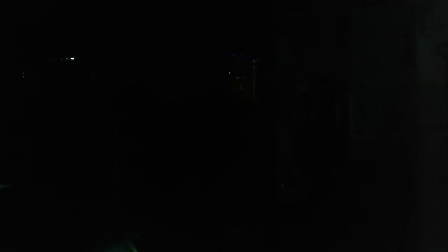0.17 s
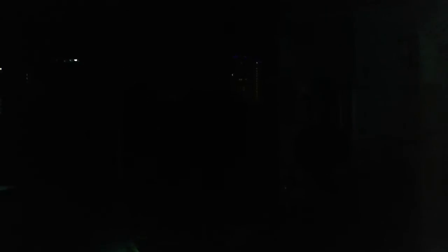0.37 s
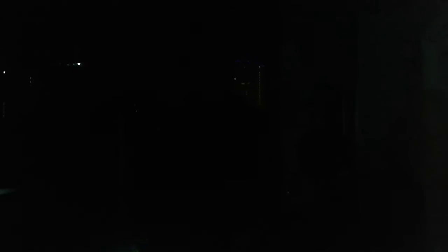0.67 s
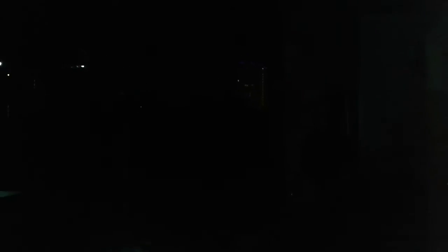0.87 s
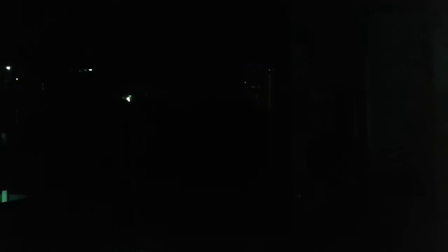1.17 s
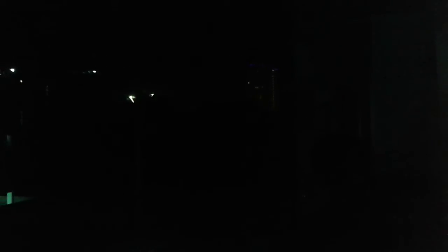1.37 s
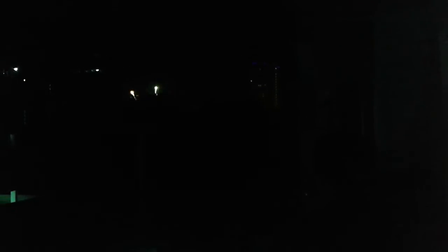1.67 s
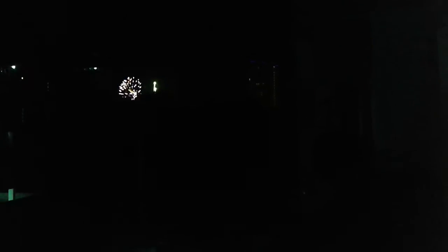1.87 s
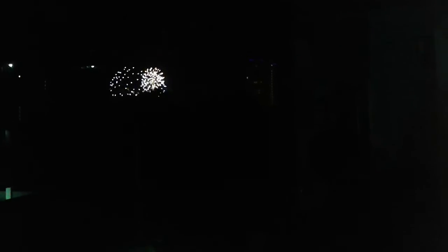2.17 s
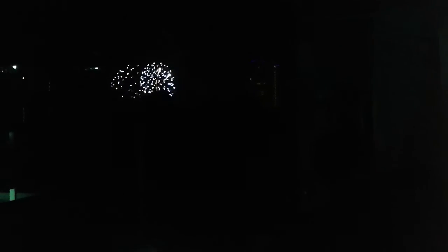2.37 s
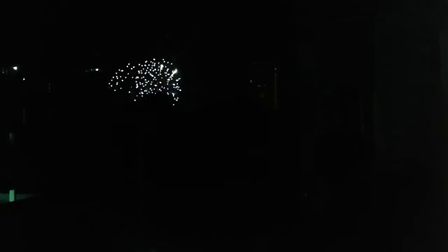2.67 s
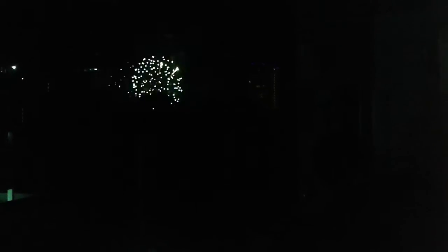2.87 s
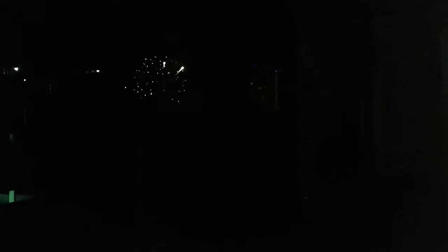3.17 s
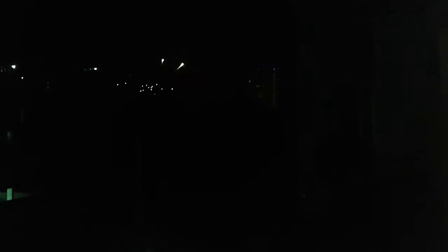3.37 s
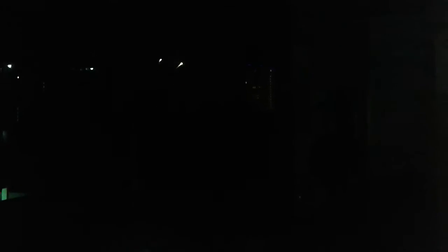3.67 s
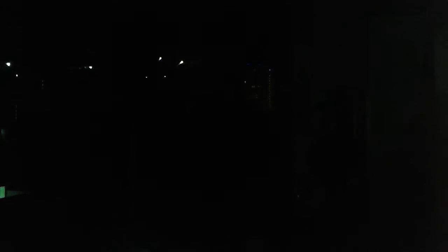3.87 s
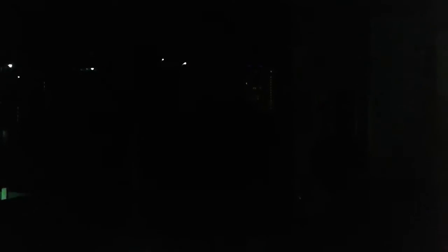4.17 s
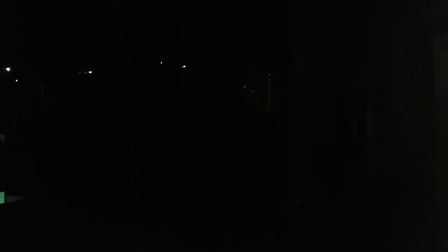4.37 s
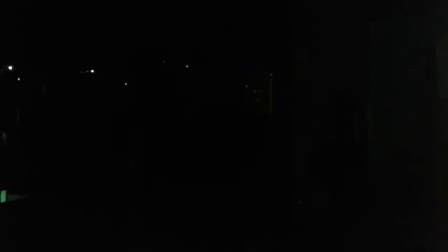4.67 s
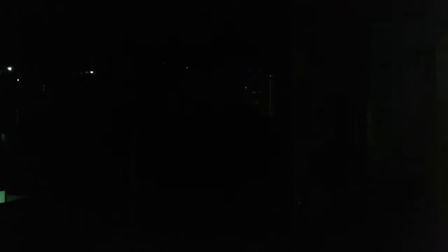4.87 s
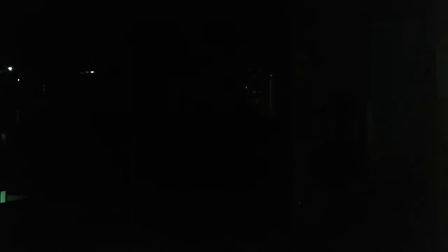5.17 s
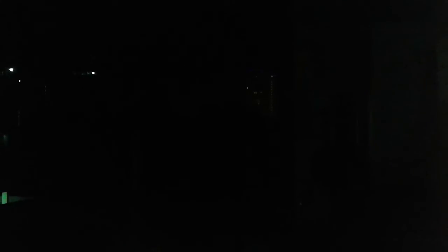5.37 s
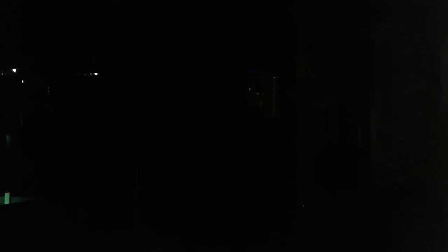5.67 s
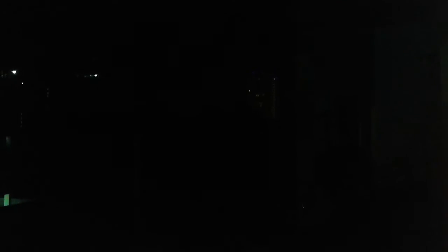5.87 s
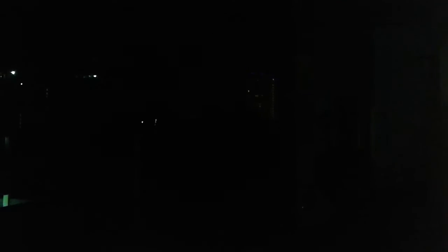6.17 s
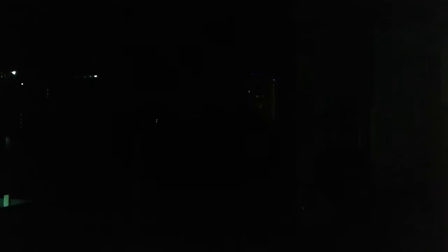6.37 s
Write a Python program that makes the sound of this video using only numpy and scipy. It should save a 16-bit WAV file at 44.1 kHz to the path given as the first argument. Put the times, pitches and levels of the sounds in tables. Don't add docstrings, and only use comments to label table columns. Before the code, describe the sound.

Distant firework salvos bang sharply at night, booming in a small balcony recess and rolling across town, with crickets and a late star crackle.

```python
import sys
import numpy as np
from scipy import signal
from scipy.fft import rfft, irfft, next_fast_len
from scipy.io import wavfile
from scipy.ndimage import map_coordinates

SR = 44100
rng = np.random.default_rng(int(sys.argv[2]) if len(sys.argv) > 2 else 0)


def dump_mix(stems):
    frames = np.atleast_2d(stems).T
    limited = np.clip(frames, -1, 1)
    pcm = np.round(limited * 32767).astype(np.int16)
    wavfile.write(sys.argv[1], SR, pcm)


def ratio(d):
    e = np.asarray(d, float) / 20
    return 10 ** e


N = 287796

# (delay [ms], level [dB], push stretch [ratio], treble corner [Hz])
BALCONY_SURFACES = [(0, 0, 1, 14000), (1.69, 0, .5, 20000), (3.1, -9, .8, 5000), (4.15, 1, 2.6, 1300),
                    (5.05, -10, .4, 9000), (6.5, -10, 1, 1500), (9.2, -11, 1.3, 900),
                    (10.5, 1.5, .2, 20000), (11.3, -9, .2, 9000)]
# (frequency [Hz], level [dB], t60 [s])
RECESS_MODES = [(142.2, -10.5, 0.19), (192.6, -1, 0.039), (265.6, -20, 0.31)]
BOOM_DELAY_MS = 13.0
BLAST_LOW_HZ = 106
# (frequency [Hz], t60 [s])
COURTYARD_T60 = [(100, 0.48), (400, 0.47), (1500, 0.15), (6000, 0.22), (12000, 0.25)]
# (frequency [Hz], density [dB per Hz])
ROLL_COLOUR = [(15, -60), (25, 9), (65, -10.5), (124, -6), (195, -3), (320, -15.5), (429, -10.5),
               (550, -20), (645, -16), (990, -22), (1950, -28), (2790, -34), (5500, -37.5), (7150, -39.5),
               (12100, -120)]
# (centre [Hz], width [Hz], lift [dB])
ROLL_MODES = [(130.3, 37, 7), (206, 11, 2), (253.6, 103, 6), (472, 130, 2.5), (647, 13, 5)]
# (time [s], near streets [dB], far town [dB])
ROLL_SOURCES = [
    (0, -55, -46),
    (.95, -12, -17.5),
    (1.6, -40, -45),
    (2.3, -50, -33.5),
    (2.75, -37, -37),
    (4.1, -44, -45),
    (4.58, -18, -26),
    (4.88, -16, -18.5),
    (5.45, -35, -49),
    (6.1, -34, -34),
]
NEAR_RISE_S, NEAR_FALL_DB_PER_S, FAR_RISE_S = 0.014, 68, 0.086
# (low edge [Hz], high edge [Hz], near [dB], far [dB], far fall [dB/s], town hum [dB])
ROLL_BANDS = [(10, 340, 2.5, -1.6, 10, -42), (360, 1420, -5, -7, 13, -51),
              (1560, 4640, -17, -14.5, 17, -59)]
# (frequency [Hz], density [dB per Hz])
CHORUS_COLOUR = [(1500, -48), (2200, -48), (3000, -33), (4800, -36), (5400, -40.5), (6300, -26),
                 (6900, -23.5), (7500, -19.5), (7900, -26.5), (8700, -26.5), (10000, -22.5), (11500, -28.5),
                 (13000, -36), (15000, -37)]
# (first chirp [s], last chirp [s], level [dB])
CRICKET_PHRASES = [(.087, .766, -49), (1.435, 1.505, -60), (1.677, 1.881, -50), (1.976, 2.451, -46),
                   (2.52, 2.996, -48), (3.073, 3.073, -47), (3.174, 3.449, -45), (3.546, 3.546, -43),
                   (3.615, 4.015, -48), (4.115, 4.26, -50), (4.35, 4.477, -48), (4.686, 4.686, -47),
                   (5.561, 5.832, -47), (5.905, 6.112, -47), (6.29, 6.357, -61), (6.463, 6.52, -52)]
CHIRP_EVERY_S, CHIRP_SCATTER_DB = 0.068, 1.5
# (time [s], depth [dB], hold [s])
DUCKS = [
    (0.833, -5, 0.46),
    (3.603, -0.5, 0.67),
    (4.563, -3.5, 0.32),
    (4.775, -7, 0.5),
]
REST_DB, GRAB_S, LET_GO_S = -3.5, 0.03, 0.24
# (time [s], peak [dB], push [ms], air cut [Hz], boom [dB])
BLASTS = [
    (0.8676, -4, 0.54, 7900, 3.5),
    (0.9326, -4.5, 0.41, 8750, 3),
    (1.0135, -10, 0.2, 6700, 6.5),
    (4.5603, -4, 0.56, 9200, 6),
    (4.7859, -2.5, 0.38, 14100, -3),
    (4.8689, -6.5, 0.24, 9900, 2.5),
]
FRONT_MS = 0.0083
# (time [s], peak [dB], push [ms], smear [ms])
ECHOES = [(1.147, -19, 0.21, 27), (1.207, -27.5, 0.086, 20), (1.236, -23, 0.235, 68),
          (1.273, -27.5, 0.054, 9), (1.305, -39, 0.06, 9), (1.361, -39, 0.095, 7.9),
          (1.571, -31, 0.21, 6.6), (5.02, -47.5, 0.026, 6.3), (5.073, -29, 0.092, 6.6),
          (5.151, -20, 0.16, 10), (5.18, -30, 0.28, 13)]
ECHO_CUT_HZ, ECHO_BOOM_DB = 7300, 4
# (time [s], peak [dB], push [ms], air cut [Hz], smear [ms], boom [dB])
FAR_THUD = (5, -29, 0.99, 605, 14, 0)
# (time [s], level [dB], frequency [Hz])
TICKS = [
    (3.525, -43, 5600),
    (3.5502, -29, 1100),
    (3.551, -36, 5700),
]
# (time [s], peak [dB])
STAR_POPS = [(5.8629, -39), (5.898, -19), (5.972, -47), (6.0107, -23), (6.0992, -22), (6.1497, -31),
             (6.1863, -31), (6.2078, -14.5), (6.2401, -41), (6.2814, -19), (6.3778, -24), (6.3993, -22),
             (6.436, -40), (6.4826, -27)]
# (frequency [Hz], level [dB])
STAR_COLOUR = [(200, -34), (500, -5.5), (1000, 3), (2500, 2.5), (5000, -3.5), (7000, -28), (10000, -55)]
SWARM_START_S, SWARM_PEAK_S = 5.7, 6.125
SWARM_PEAK_DB, SWARM_RISE_DB_PER_S, SWARM_FALL_DB_PER_S = -33, 26.5, 29


def unit(x):
    return x / np.sqrt(np.mean(x ** 2) + 1e-20)


def along(points, hz):
    f, v = np.transpose(points)
    return np.interp(np.log(hz + 1), np.log(f + 1), v)


def wobble(rate_hz):
    knots = rng.standard_normal(int(N * rate_hz / SR) + 4)
    return map_coordinates(knots, [np.arange(N) * rate_hz / SR])


def filtered(x, response):
    m = next_fast_len(len(x) + 8192)
    return irfft(rfft(x, m) * response(np.fft.rfftfreq(m, 1 / SR)), m)[:len(x)]


def band(hz, lo_hz, hi_hz):
    return 1 / np.sqrt((1 + (lo_hz / (hz + 1)) ** 6) * (1 + (hz / hi_hz) ** 6))


def swell(start_s, rise_s, fall_db_per_s):
    t = np.clip(np.arange(N) / SR - start_s, 0, None)
    return (1 - np.exp(-t / rise_s) * (start_s > 0)) ** 2 * ratio(-2 * fall_db_per_s * t)


def roll():
    lift = lambda hz: sum(db / (1 + (2 * (hz - c) / w) ** 2) for c, w, db in ROLL_MODES)
    lumps, out = wobble(17), 0
    near = sum(ratio(2 * db) * swell(s, NEAR_RISE_S, NEAR_FALL_DB_PER_S) for s, db, _ in ROLL_SOURCES)
    for lo_hz, hi_hz, near_db, far_db, fall_db_per_s, hum_db in ROLL_BANDS:
        far = sum(ratio(2 * db) * swell(s, FAR_RISE_S, fall_db_per_s) for s, _, db in ROLL_SOURCES)
        level = np.sqrt(ratio(2 * near_db) * near + ratio(2 * far_db) * far + ratio(2 * hum_db))
        colour = lambda hz: ratio(along(ROLL_COLOUR, hz) + lift(hz)) * band(hz, lo_hz, hi_hz)
        noise = filtered(rng.standard_normal(N), colour)
        out = out + level * unit(noise * ratio(1.3 * lumps + 0.2 * wobble(30)))
    return out


def chorus():
    colour = lambda hz: ratio(along(CHORUS_COLOUR, hz)) * (hz > 1200) * (hz < 15050)
    hiss = filtered(rng.standard_normal(N), colour)
    return ratio(-52 + 0.13 * wobble(4.1)) * unit(hiss)


def katydid():
    stroke_hz = 392.5 * (1 + 0.00036 * wobble(6.4))
    strokes = np.diff(np.floor(np.cumsum(stroke_hz) / SR), prepend=0)
    strong_weak = 1 + 0.5 * (-1) ** np.cumsum(strokes)
    sizes = strokes * strong_weak * ratio(0.91 * rng.standard_normal(N))
    wing = lambda hz: 1 / (1 + ((hz - 9900) / 900) ** 2) + 1.1 / (1 + ((hz - 9620) / 60) ** 2)
    return ratio(-59.5 + 0.37 * wobble(2.2)) * unit(filtered(sizes, wing))


def near_cricket():
    out, t = np.zeros(N + SR), np.arange(-0.018, 0.018, 1 / SR)
    shape = np.abs(np.cos(np.pi * t / (2 * t[0]))) ** 0.5 * ratio(-170 * t)
    for first_s, last_s, phrase_db in CRICKET_PHRASES:
        count = round((last_s - first_s) / CHIRP_EVERY_S) + 1
        for s in np.linspace(first_s, last_s, count):
            db = phrase_db + CHIRP_SCATTER_DB * rng.standard_normal()
            pitch_hz = 6200 * (1 + 0.0123 * rng.standard_normal()) - 24000 * t
            tone = np.sin(2 * np.pi * np.cumsum(pitch_hz) / SR)
            pulses = 1 + 0.5 * np.sin(2 * np.pi * (290 * t + rng.random()))
            out[round((s + t[0]) * SR):][:len(t)] += ratio(db - 11.5) * shape * pulses * tone
    return out[:N] * ratio(2.2 * wobble(250) + 1.5 * wobble(12))


def insect(centre_hz, width_hz):
    wing = lambda hz: 1 / (1 + ((hz - centre_hz) / width_hz) ** 2)
    return unit(filtered(rng.standard_normal(N), wing))


def wing_beat(start_s, period_s):
    return np.cos(np.pi * (np.arange(N) / SR - start_s) / period_s) ** 2


def far_crickets():
    far = ratio(-60.5 + 3 * wobble(1.5)) * wing_beat(0.03, 0.0745) ** 1.5 * insect(6150, 280)
    high = ratio(-52.0 + 0.48 * wobble(3.3)) * wing_beat(0.064, 0.1045) ** 3 * insect(7400, 230)
    low = ratio(-68.5 + 1.1 * wobble(3.6)) * insect(2160, 120)
    return far + high + low


def insect_gap(hz):
    return 1 - 0.97 * 1j * hz * 1100 / (8200 ** 2 - hz ** 2 + 1j * hz * 1100)


def duck():
    t, gain_db = np.arange(N) / SR, REST_DB
    for s, db, hold_s in DUCKS:
        corners_s = [0, GRAB_S, GRAB_S + hold_s, GRAB_S + hold_s + LET_GO_S]
        gain_db = gain_db + np.interp(t - s, corners_s, [0, db, db, 0])
    return ratio(gain_db)


def air_cut(hz, cut_hz):
    s = 1j * hz / cut_hz
    return 1 / (1 + np.sqrt(2) * s + s * s) ** 3


def balcony(hz, push_ms, slant):
    total = 0
    for delay_ms, db, stretch, corner_hz in BALCONY_SURFACES:
        push_s = push_ms * stretch / 1000
        s = 2j * np.pi * hz * push_s
        blast = SR * push_s * s / (1 + 0.75 * s + s * s)
        delay = np.exp(-2j * np.pi * hz * slant * delay_ms / 1000)
        rough = air_cut(hz, 8500) if delay_ms else 1
        total = total + ratio(db) * blast * delay * rough / (1 + 1j * hz / corner_hz) ** 2
    return total


def courtyard():
    hz, t, z = signal.stft(rng.standard_normal(SR // 2), SR, nperseg=256)
    decay = ratio(-60 * t / along(COURTYARD_T60, hz)[:, None])
    tail = signal.istft(z * decay, SR, nperseg=256)[1][:SR // 2]
    tail = tail * (1 - np.exp(-np.arange(len(tail)) / SR / 0.013))
    return tail / np.linalg.norm(tail)


def recess_boom(t):
    late = np.clip(t - BOOM_DELAY_MS / 1000, 0, None)
    ring = sum(ratio(db - 60 * late / t60) * np.sin(2 * np.pi * hz * late) for hz, db, t60 in RECESS_MODES)
    return filtered(ring, lambda hz: band(hz, BLAST_LOW_HZ, SR))


def bangs():
    out, t = np.zeros(N + SR), np.arange(SR // 2) / SR
    ring = recess_boom(t)
    direct = [(s, db, push_ms, cut_hz, FRONT_MS, boom_db) for s, db, push_ms, cut_hz, boom_db in BLASTS]
    returns = [(s, db, push_ms, ECHO_CUT_HZ, smear_ms, ECHO_BOOM_DB) for s, db, push_ms, smear_ms in ECHOES]
    edge = lambda hz: air_cut(hz, 7500) * (1j * hz / (2000 + 1j * hz)) ** 2
    for s, db, push_ms, cut_hz, smear_ms, boom_db in direct + returns + [FAR_THUD]:
        noise = rng.standard_normal((2, len(t)))
        scattered = smear_ms > 2
        facets = np.exp(-t / (smear_ms / 1000)) * (noise[0] if scattered else 1)
        slant = rng.uniform(0.7, 1.2) if scattered else 1
        near = filtered(facets, lambda hz: balcony(hz, push_ms, slant) * air_cut(hz, cut_hz))
        near /= np.abs(near).max()
        railing = noise[1] * np.exp(-t / 0.0025)
        fray = filtered(signal.fftconvolve(near, railing)[:len(t)], edge)
        tail = ratio(-5.0) * signal.fftconvolve(near, courtyard())[:len(t)]
        out[round(s * SR):][:len(t)] += ratio(db) * (near + ratio(-18.0) * fray + tail + ratio(boom_db) * ring)
    return out[:N]


def ticks():
    out, t = np.zeros(N), np.arange(SR // 100) / SR
    for s, db, hz in TICKS:
        snap = np.sin(2 * np.pi * hz * t) + rng.standard_normal(len(t))
        out[round(s * SR):][:len(t)] += ratio(db - 60 * t / 0.0079) * snap * (1 - np.exp(-t / 0.00049))
    rustle_shape = np.exp(-((np.arange(N) / SR - 3.57) / 0.13) ** 2)
    rustle = unit(filtered(rng.standard_normal(N), lambda hz: band(hz, 3500, 6500)))
    return filtered(out, lambda hz: air_cut(hz, 9000)) + ratio(-59.5) * rustle_shape * rustle


def crackle():
    first, slants = round(SWARM_START_S * SR), (0.96, 0.99, 1.01, 1.04)
    draws = rng.random((2000, 3))
    sparks = np.zeros((len(slants), N - first))
    direction = (draws[:, 0] * len(slants)).astype(int)
    moment = (draws[:, 1] * (N - first)).astype(int)
    np.add.at(sparks, (direction, moment), ratio(-4 * np.log(draws[:, 2] + 0.01)))
    late = np.arange(first, N) / SR - SWARM_PEAK_S
    swarm_db = np.minimum(SWARM_RISE_DB_PER_S * late, -SWARM_FALL_DB_PER_S * late)
    sparks = unit(sparks) * ratio(SWARM_PEAK_DB - 15.5 + swarm_db)
    t = np.arange(SR // 50) / SR
    for k, (s, db) in enumerate(STAR_POPS):
        clump = t / 0.0024 * np.exp(-t / 0.003) * rng.standard_normal(len(t))
        sparks[k % len(slants), round(s * SR) - first:][:len(t)] += ratio(db - 13) * clump
    out = np.zeros(N)
    for part, slant in zip(sparks, slants):
        near = filtered(part, lambda hz: balcony(hz, 0.11, slant) * ratio(along(STAR_COLOUR, hz) - 2.5))
        out[first:] += near + ratio(-4) * signal.fftconvolve(near, courtyard())[:len(near)]
    return out


def scene():
    night = filtered(far_crickets() + katydid() + chorus(), insect_gap)
    near = bangs() + crackle() + ticks() + near_cricket()
    return (near + duck() * (roll() + night))[None]


def microphone(hz):
    low = 1j * hz / 66
    cut = (low ** 2 / (1 + 1.4 * low + low ** 2)) ** 2
    port = 1 + 2.83 * 1j * hz * 800 / (5800 ** 2 - hz ** 2 + 1j * hz * 800)
    return cut * port * (hz < 15100)


def low_pass(x):
    return signal.sosfilt(signal.butter(12, 15770, fs=SR, output="sos"), x)


def record(dry):
    x = filtered(dry[0], microphone)
    x = x / (1 + np.abs(x / 0.72) ** 9) ** (1 / 9)
    return low_pass(x[None])


dry = scene()
out = record(dry)
dump_mix(out)
```